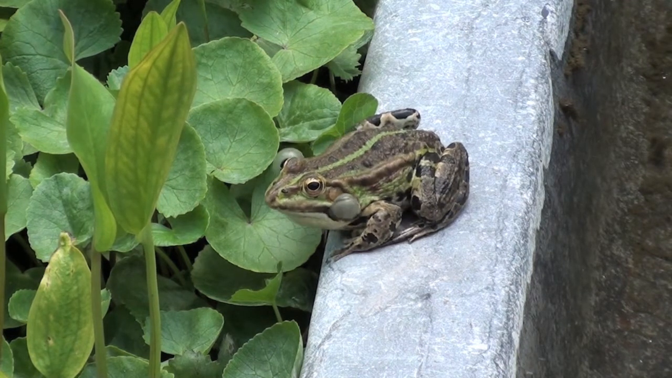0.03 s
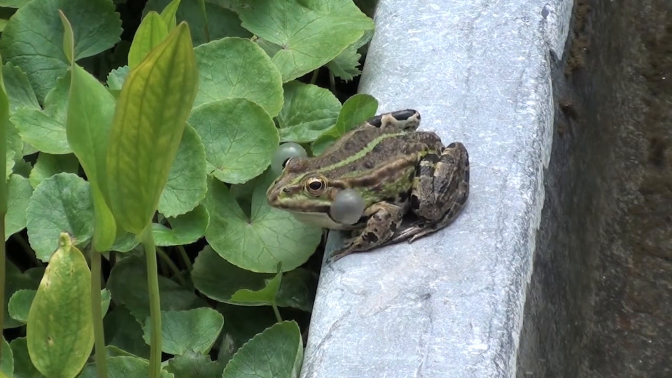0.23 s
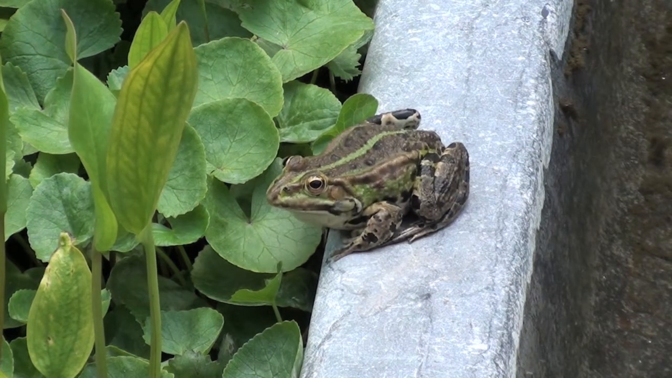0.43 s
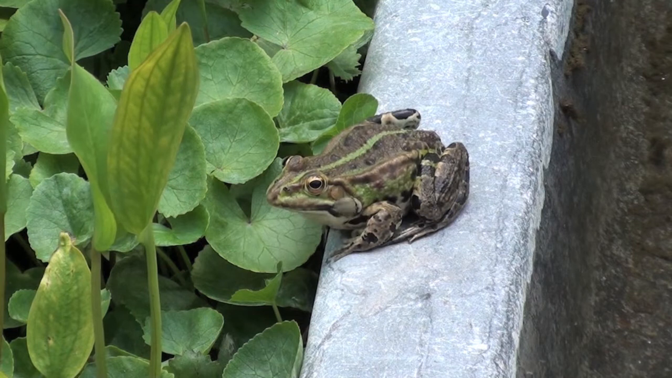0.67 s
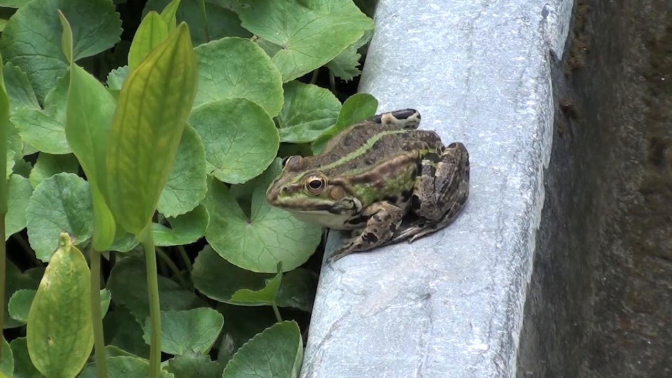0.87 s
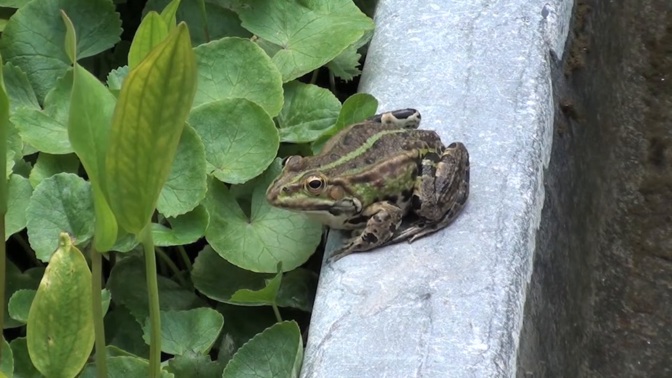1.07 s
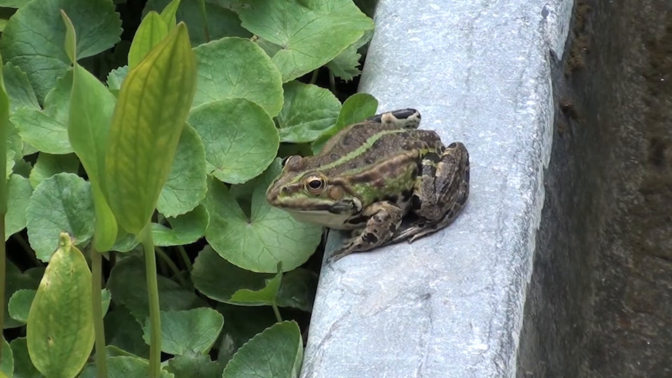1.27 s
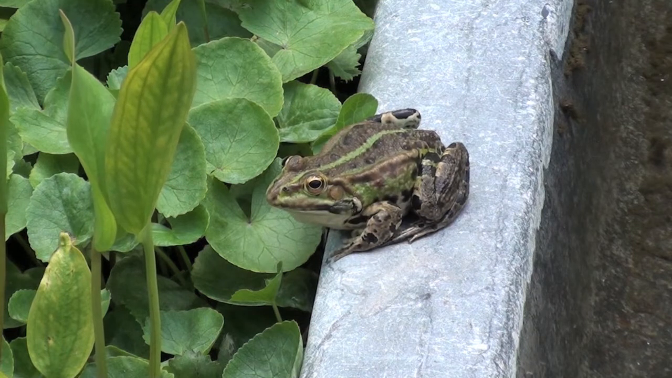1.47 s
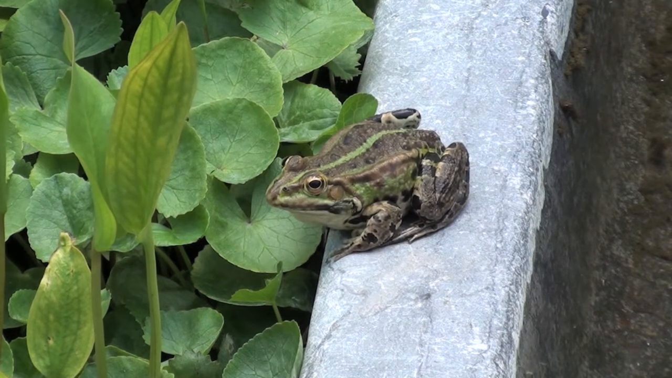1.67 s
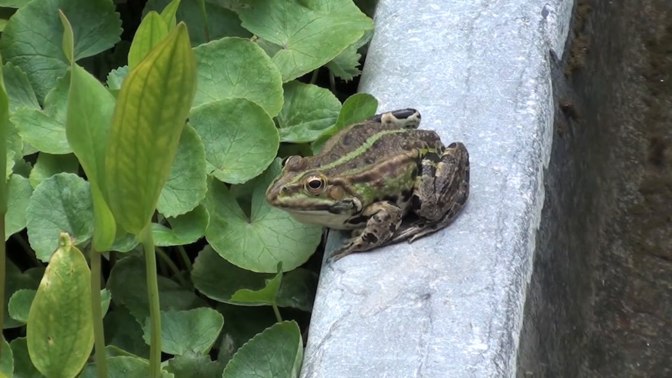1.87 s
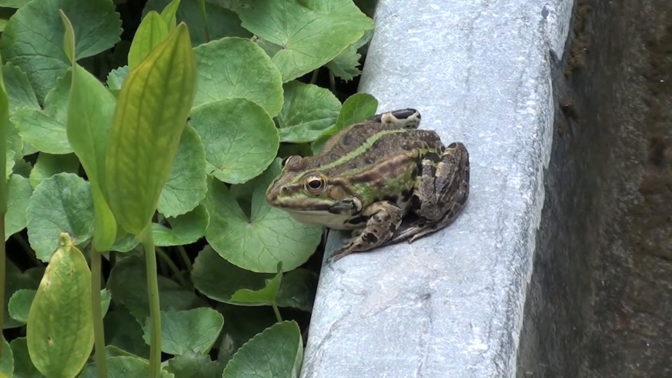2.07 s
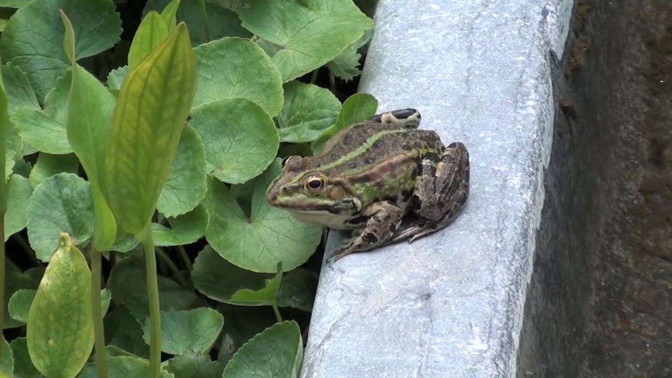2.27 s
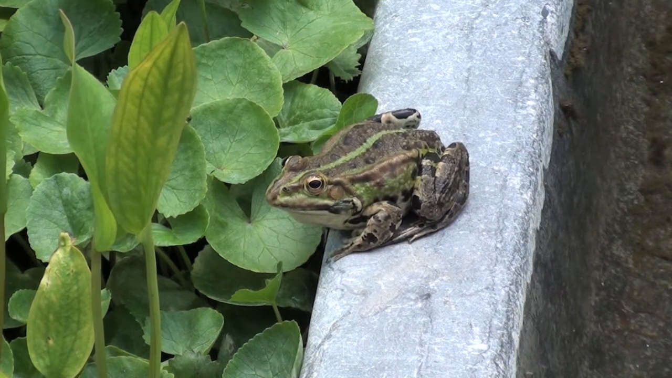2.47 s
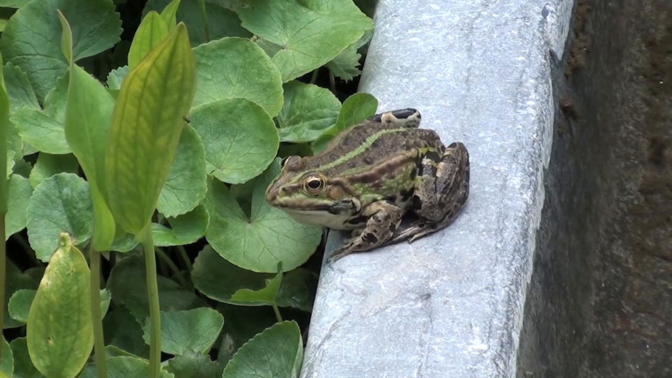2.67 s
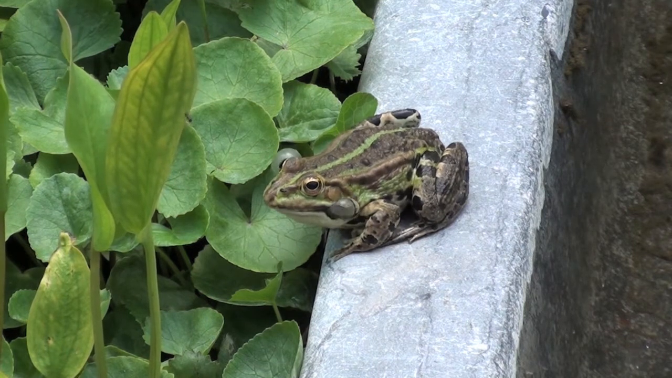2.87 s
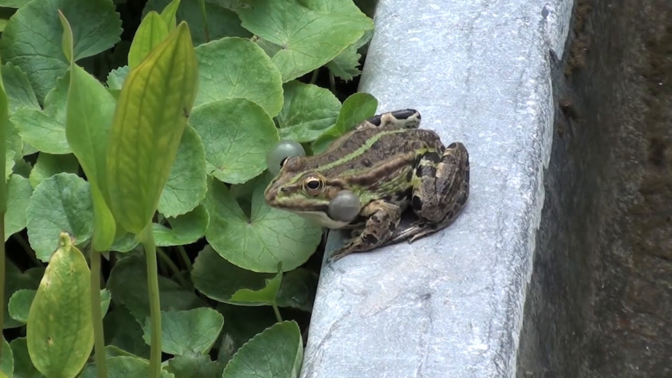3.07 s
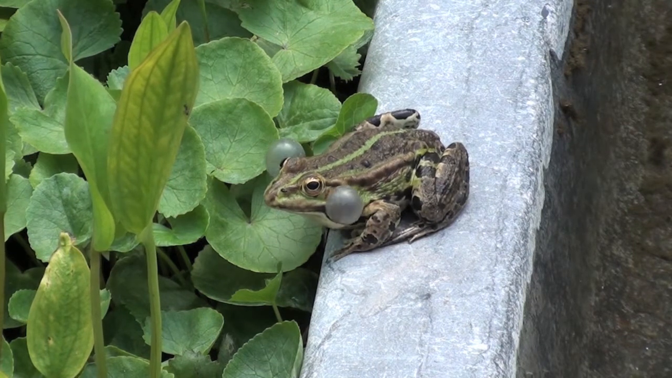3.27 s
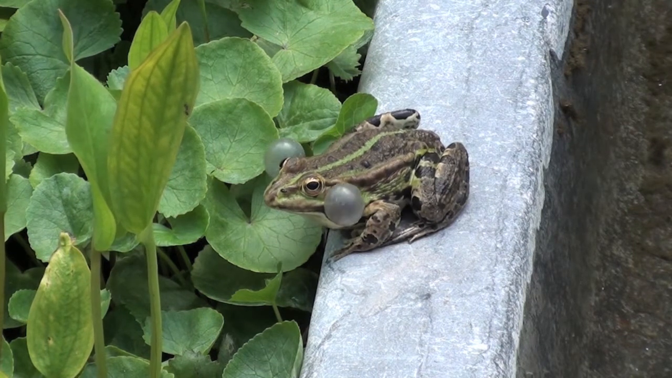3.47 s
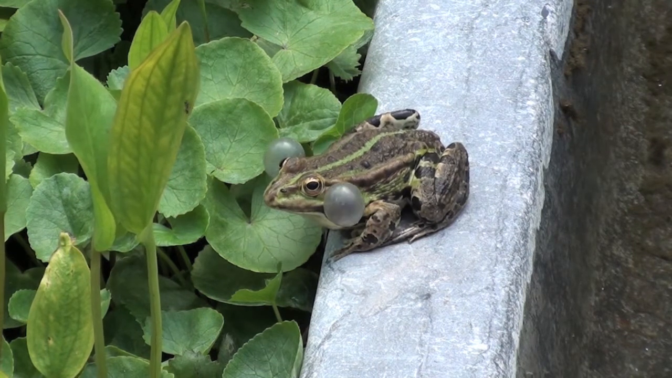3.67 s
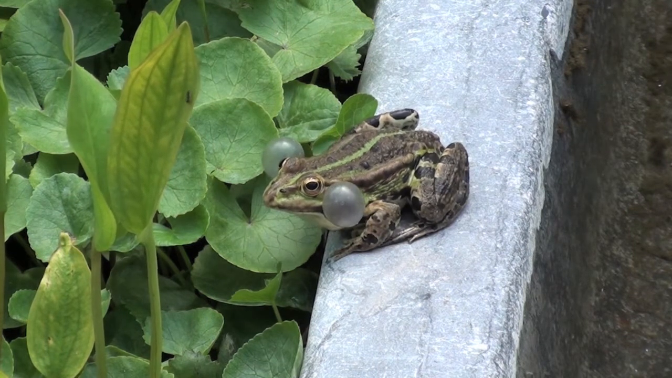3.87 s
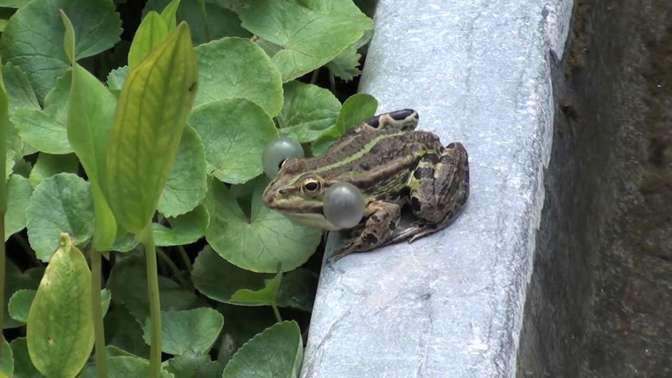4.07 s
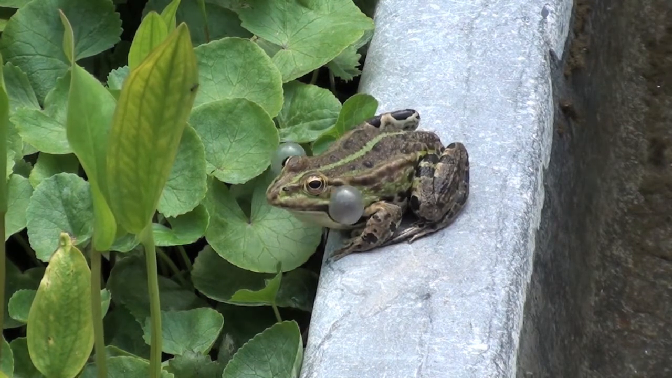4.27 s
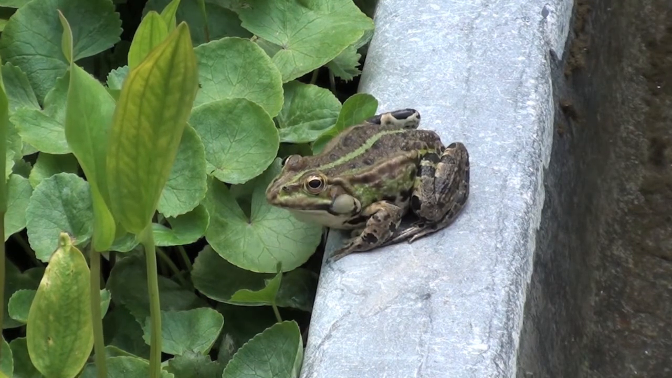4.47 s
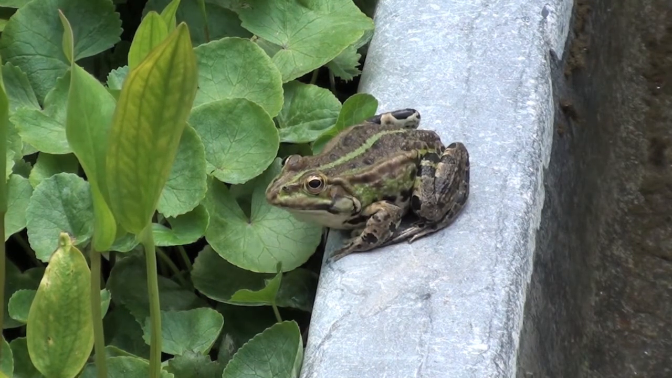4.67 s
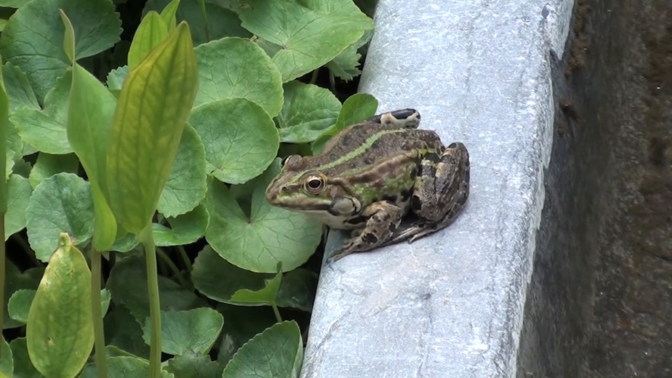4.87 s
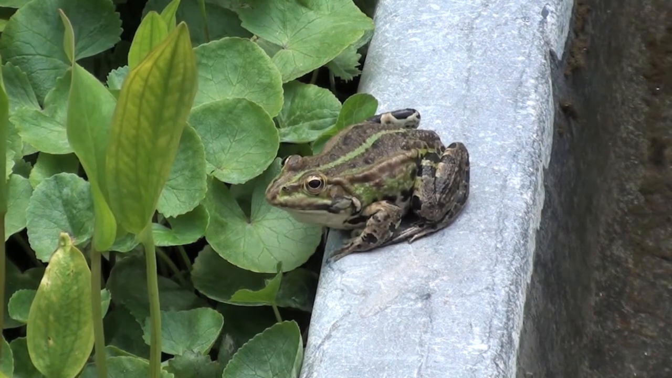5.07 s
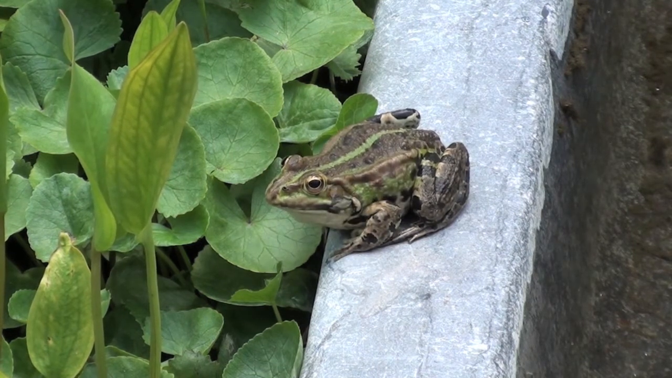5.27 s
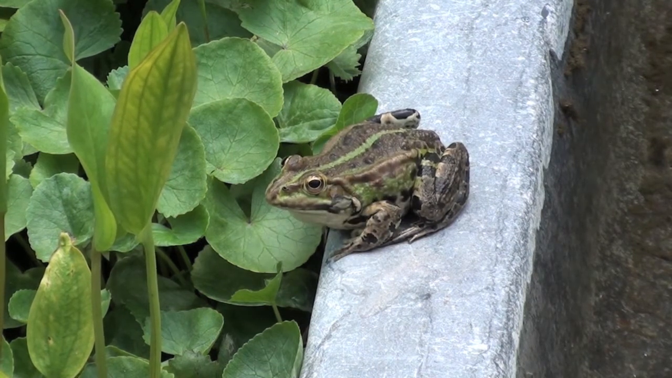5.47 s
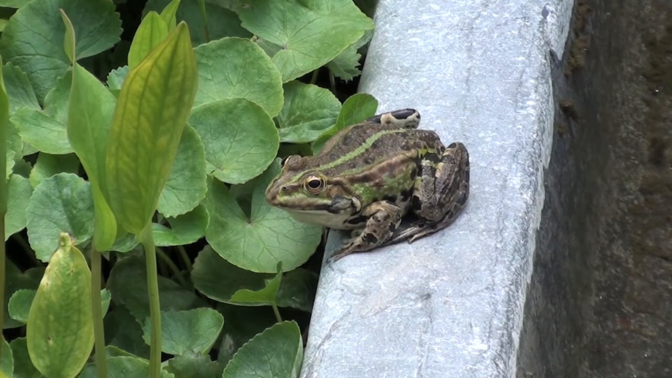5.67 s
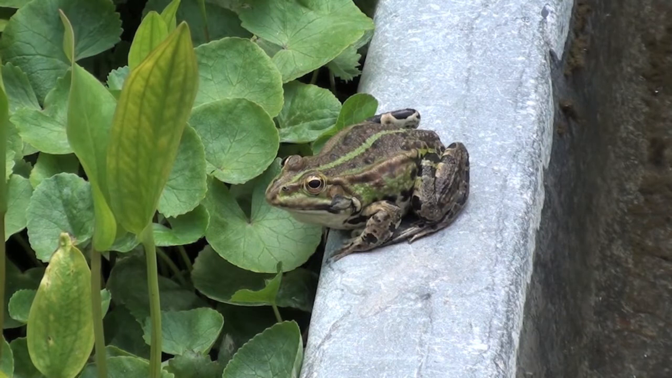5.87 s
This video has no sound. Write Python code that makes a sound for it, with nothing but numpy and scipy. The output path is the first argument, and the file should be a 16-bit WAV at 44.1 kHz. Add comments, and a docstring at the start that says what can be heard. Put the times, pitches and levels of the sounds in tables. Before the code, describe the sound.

A water frog by a walled pool squawks, then gives a long swelling rattling croak, while a farther frog rattles fainter over soft outdoor hush.

```python
"""Over a steady outdoor hush and a faint fluttering band of noise near 2.3 kHz, a water frog at the edge
of a walled pool squawks. A second frog, farther off, gives two rattles; then the near one clicks, squawks,
gives a long swelling rattle through its two cheek sacs and squawks again. Faint birds coo and chirp, the far
frog rattles a third time, and a third frog clucks softly at the end. Each squawk, click and rattle is made of
larynx pulses ringing the sacs and throat, answered by the pool walls; birds and clucks are gliding sine tones."""
import sys
import numpy as np
from scipy import signal
from scipy.fft import rfft, irfft, next_fast_len
from scipy.io import wavfile
from scipy.ndimage import uniform_filter1d, minimum_filter1d, map_coordinates

SR = 44100
rng = np.random.default_rng(int(sys.argv[2]) if len(sys.argv) > 2 else 0)


def log_audio(samples):
    """Write samples as a 16-bit WAV file to the path given in sys.argv[1]."""
    # one column per channel
    frames = np.atleast_2d(samples).T
    # limit to full scale, then quantise
    limited = np.clip(frames, -1, 1)
    pcm = np.round(limited * 32767).astype(np.int16)
    wavfile.write(sys.argv[1], SR, pcm)


N = 260631  # length in samples


def amp(db):
    """Turn decibels into a gain."""
    return 10 ** (np.asarray(db) / 20)


def unit(x):
    """Scale to an average (rms) strength of 1."""
    return x / np.sqrt(np.mean(x ** 2) + 1e-20)


def along(points, hz):
    """Read a curve of (pitch_hz, value) points, evenly in musical pitch."""
    point_hz, value = np.transpose(points)
    return np.interp(np.log(hz + 1), np.log(point_hz + 1), value)


def read(rows, times):
    """Read each column of a curve at the given times; the first column is time."""
    row_s, *columns = np.transpose(rows)
    return [np.interp(times, row_s, column) for column in columns]


def filtered(x, response):
    """Multiply the spectrum of x by a response that depends on frequency."""
    size = next_fast_len(N + SR // 2)
    spectrum = rfft(x, size) * response(np.fft.rfftfreq(size, 1 / SR))
    return irfft(spectrum, size)[..., :N]


def coloured(x, points, size=2048):
    """Shape the tone to (pitch_hz, gain_db) points without sounding ahead of time."""
    gain = amp(along(points, np.fft.rfftfreq(size, 1 / SR)))
    # folding the cepstrum forward keeps the whole filter response after each sound
    cepstrum = irfft(np.log(gain))
    cepstrum[1:size // 2] *= 2
    cepstrum[size // 2 + 1:] = 0
    impulse = irfft(np.exp(rfft(cepstrum)))
    return signal.fftconvolve(x, impulse)[:N]


def yard(x, side_db, size=256):
    """Stereo echo made of fading noise; each pitch range dies at its own pace, the treble soonest."""
    # echo fade: pitch_hz, time_to_fall_60_db_s
    fade_times = [(300, 0.2), (700, 0.4), (2000, 0.33), (5000, 0.36), (9000, 0.05)]
    hz, t, noise = signal.stft(rng.standard_normal((2, SR // 2)), SR, nperseg=size)
    fade_s = along(fade_times, hz)[:, None]
    tail = signal.istft(noise * amp(-60 * t / fade_s), SR, nperseg=size)[1]
    tail = tail / np.linalg.norm(tail[0])
    mid, side = signal.fftconvolve(x[None], tail, axes=1)[:, :N]
    return np.array([mid + amp(side_db) * side, mid - amp(side_db) * side])


def walls(x, tones, width_hz):
    """Close reflections add up to narrow, briefly ringing resonances on top of the direct sound."""
    def response(f):
        total = 1
        for hz, db in tones:
            damping = 1j * f * width_hz
            total = total + amp(db) * damping / (hz ** 2 - f ** 2 + damping)
        return total
    return filtered(x, response)


def hush():
    """Steady outdoor air: shaped noise, nearly alike in both ears in the bass, wider in the middle range."""
    # tone of the air: pitch_hz, relative_level_db_per_hz
    air_colour = [(20, -26), (40, -12), (65, -0.5), (105, -4), (175, 1.5), (300, -0.5), (450, -3),
                  (700, -1), (1300, -8), (1900, -9), (3300, -11), (5300, -12.5), (9000, -16),
                  (15500, -17.5)]
    # how alike left and right are: pitch_hz, likeness (1 = the same)
    likeness = [(40, 1), (130, 0.99), (260, 0.85), (700, 0.34), (2500, 0.36), (8000, 1)]

    def response(hz):
        turn = np.arccos(np.clip(along(likeness, hz), -1, 1)) / 2
        return amp(along(air_colour, hz)) * [np.cos(turn), np.sin(turn)]

    mid, side = filtered(rng.standard_normal((2, N)), response)
    return amp(-52.5) * unit(np.array([mid + side, mid - side]))


def faint_band(flutter_rate=45):
    """A faint band of noise near 2.3 kHz, fluttering at random; perhaps the far frog's long echo."""
    # the band over time: time_s, level_db (before the flutter and the left-right balance)
    band_levels = [(0, -49), (1.45, -60), (2.2, -55), (2.42, -53), (2.65, -62), (5.3, -58.5), (5.5, -74),
                   (5.91, -61)]
    t = np.arange(N) / SR
    level_db, = read(band_levels, t)
    flutter = map_coordinates(rng.standard_normal(int(t[-1] * flutter_rate) + 4), [t * flutter_rate])
    colour = [(1300, -39), (1900, -14), (2250, -8), (2600, -18), (3300, -37.5)]  # pitch_hz, gain_db
    band = filtered(rng.standard_normal(N), lambda hz: amp(along(colour, hz)))
    return amp(level_db + 2 * flutter) * unit(band) * amp([[1], [-1]])  # a little to the left


def ring(pulses, voice, attack, scatter, rough_db, size=800):
    """Every (time_s, level_db) pulse rings the sacs, their overtones and the throat as dying sine tones."""
    # throat tones: pitch_hz, ring_s (stretched below while the sacs are slack), relative_level_db
    throat_tones = [(641, 0.001, -2), (925, 0.00051, -3.5)]
    # overtones: ratio_to_overtone_pitch, ring_s, relative_level_db
    overtones = [(0.842, 0.0012, -6.5), (0.998, 0.0013, -2), (1.575, 0.002, -27.5), (2.2, 0.0017, -32.5),
                 (2.49, 0.0012, -20.5)]
    s, db = np.transpose(pulses)
    sac_hz, sac_ring, throat_db, over_hz, over_db = [c[:, None] for c in read(voice, s)]
    index = np.ceil(s * SR).astype(int)[:, None] + np.arange(size)
    t = index / SR - s[:, None]  # seconds since each pulse
    chance = rng.standard_normal((len(s), 3))

    def mode(hz, life):
        return np.sin(2 * np.pi * hz * t) * np.exp(-t / life)

    sac = mode(sac_hz * (1 + scatter * chance[:, :1]), sac_ring)
    slack = amp(throat_db)  # with slack sacs the throat rings louder and longer
    throat = slack * sum(amp(level) * mode(hz, life * (1 + slack)) for hz, life, level in throat_tones)
    pulse_over_hz = over_hz * (1 + 0.015 * chance[:, 1:2])
    over = sum(amp(level) * mode(ratio * pulse_over_hz, life) for ratio, life, level in overtones)
    wave = sac + throat - amp(over_db + rough_db * chance[:, 2:]) * over
    wave *= amp(db)[:, None] * (1 - np.exp(-t / attack)) ** 2  # soft tissue starts smoothly
    return np.bincount(index.clip(0).ravel(), wave.ravel(), N)[:N]


def near_ring(pulses, s, sac_hz, throat_db, sac_ring, over_hz, over_db):
    """The near frog's voice; each control is a constant or a curve over the times s."""
    voice = np.column_stack(np.broadcast_arrays(s, sac_hz, sac_ring, throat_db, over_hz, over_db))
    return ring(pulses, voice, attack=0.00013, scatter=0.036, rough_db=2.5)


def squawk(rows, jitter, rough_db):
    """An unbroken, uneven train of pulses following (time_s, pulses_per_s, level_db) rows."""
    t = np.arange(rows[0][0], rows[-1][0], 1 / SR)
    rate, db = read(rows, t)
    pulse_count = np.floor(np.cumsum(rate) / SR)
    at = np.flatnonzero(np.diff(pulse_count, prepend=-1))  # a pulse wherever the count steps up
    chance = rng.standard_normal((len(at), 2))
    pulse_s = t[at] + jitter * chance[:, 0] / rate[at]
    return list(zip(pulse_s, db[at] + rough_db * chance[:, 1]))


def beat(first, last, rate, slowing):
    """Note times of a rattle whose beat slows (or quickens) evenly."""
    u = np.linspace(0, 1, round((last - first) * rate) + 1)
    return first + (last - first) * (u - slowing * u * (1 - u) / 2)


def note(s, db, gap, before_db, step, opening_db, count=5):
    """One rattle note: a dense buzz of small pulses grows and slows into two strong ones."""
    k = np.arange(count)  # counted backwards from the strong pair
    steps = step * .72 ** k * np.exp(0.131 * rng.standard_normal(count))
    lead_s = s - gap - np.cumsum(steps)
    lead_db = db + before_db / 2 + opening_db + 6 * 0.22 ** k + 0.65 * rng.standard_normal(count)
    # one weak pulse trails behind
    straggler = (s + rng.uniform(.008, .013), db - 12 + 2.5 * rng.standard_normal())
    return [*zip(lead_s, lead_db), (s - gap, db + before_db), (s, db), straggler]


def rattle(sac_ring=0.00108, rough_db=0.8, pair_db=1.6, gap_scatter=0.08):
    """Notes on a slowing beat; as the sacs fill, they swell, lose their throatiness and grow brighter."""
    # the beat: first_note_s, last_note_s, notes_per_s, share by which the beat slows
    timing = (3.0698, 4.191, 23.2, 0.058)
    # the sacs tighten, then slacken: time_s, sac_pitch_hz
    sac_curve = [(3.06, 2140), (3.328, 2660), (3.482, 2760), (4.014, 2600), (4.096, 2380), (4.21, 2300)]
    full_db, swell_db, swell_s = -3.8, 19.6, 0.3  # full effort, how far below it starts, time constant
    gap_s, gap_grows_s_per_s = 0.0052, 0.0018  # usual gap between a note's two strong pulses; it widens
    before_db = -3.2  # usual level of the first strong pulse against the second
    throat_db, throat_slack_db = -14.5, 9.5  # throat under full sacs; how much louder under slack ones
    over_hz, over_slack_hz = 4670, 160  # overtone pitch of full sacs; how much higher when slack
    over_db, over_db_per_s = -20.5, 12.5  # the overtones brighten through the rattle
    times = beat(*timing)
    age = times - times[0]
    slack = np.exp(-age / swell_s)
    pulses = []
    for s, level, usual_gap in zip(times, full_db - swell_db * slack, gap_s + gap_grows_s_per_s * age):
        chance = rng.standard_normal(3)
        db = level + rough_db * chance[0]
        gap = usual_gap * np.exp(gap_scatter * chance[1])
        lean_db = pair_db * chance[2]  # either pulse of the pair may be the stronger
        opening_db = -18.4 - .5 * db  # the opening buzz stands out more in quiet notes
        pulses += note(s + gap / 2, db - lean_db / 2, gap, before_db + lean_db, .0043, opening_db)
    sac_hz, = read(sac_curve, times)
    return near_ring(pulses, times, sac_hz, throat_db + throat_slack_db * slack, sac_ring,
                     over_hz + over_slack_hz * slack, over_db + over_db_per_s * age)


def near_frog():
    """Squawks, clicks and the long rattle: pulses ring the sacs and throat, then the pool walls colour them."""
    # squawks, one curve each: time_s, pulses_per_s, pulse_level_db, sac_pitch_hz, throat_level_db
    squawk_curves = [
        [(.003, 155, -40, 1010, 8.5), (.062, 190, -32, 1110, 7.5), (.083, 235, -17, 1540, -3),
         (.142, 251, -2.5, 1860, -15.5), (.175, 234, -4, 1890, -14.5), (.2, 380, -1.5, 1950, -11),
         (.222, 340, -9, 2070, -4.5), (.24, 300, -21.5, 2070, -3)],
        [(2.9445, 98, -19.5, 1700, 0), (2.985, 134, -20, 1700, -2), (3.02, 185, -30.5, 1810, -2),
         (3.043, 220, -26, 1980, -4)],
        [(4.2045, 123, -14, 2280, -10.5), (4.216, 250, -12, 2220, -8), (4.232, 295, -4.5, 2190, -5),
         (4.246, 297, -20, 2200, -4.5)],
    ]
    # tone of each squawk: sac_ring_s (at the pitch ring_at_hz), overtone_pitch_hz, overtone_level_db
    squawk_tones = [(0.0005, 4980, -19.5), (0.001, 5090, -17.5), (0.00105, 4690, -13)]
    # single pulses before the rattle: time_s, pulse_level_db
    click_pulses = [(2.68, -49.5), (2.7965, -38.5), (2.8728, -31.5), (2.9126, -26), (2.9235, -25.5)]
    # slack sacs: sac_pitch_hz, throat_level_db, sac_ring_s, overtone_pitch_hz, overtone_level_db
    click_tone = (2070, 6, 0.0012, 5450, -17)
    # tone of the whole call: pitch_hz, gain_db
    call_colour = [(280, -50), (440, -14.5), (570, -15), (660, -4), (1300, 2.5), (1650, -2), (2600, 1),
                   (3400, -1), (5000, -0.5), (6200, -2), (9000, 3.5), (11700, 2), (14000, -30)]
    # tones the pool walls reinforce: pitch_hz, level_against_direct_sound_db
    wall_tones = [(652, -2), (822, 2.5), (975, 2), (1115, 1), (1272, 8), (1384, 2), (1539, 9), (1630, -3),
                  (1851, 7), (2110, 2), (2340, -9), (2694, -7), (2855, -3), (3230, 4.5)]
    ring_at_hz = 2000  # slacker sacs die sooner than at this pitch
    call = near_ring(click_pulses, [0], *click_tone) + rattle()
    for rows, (sac_ring, over_hz, over_db) in zip(squawk_curves, squawk_tones):
        s, rate, db, sac_hz, throat_db = np.transpose(rows)
        pulses = squawk(np.column_stack([s, rate, db]), jitter=0.082, rough_db=1.85)
        ring_s = sac_ring * sac_hz / ring_at_hz
        call = call + near_ring(pulses, s, sac_hz, throat_db, ring_s, over_hz, over_db)
    call = amp(3.0) * coloured(call, call_colour)
    call = walls(call, wall_tones, width_hz=35)
    return (call + amp(-10.5) * yard(call, side_db=-15.5)) * amp([[.25], [-.25]])


def far_frog():
    """The same kind of rattle, and some clicks, from the left, blurred by distance with a strong echo."""
    # rattles: first_note_s, last_note_s, notes_per_s, share by which the beat slows (negative: quickens),
    # middle_level_db, rise_db, throat_level_db, overtone_pitch_hz
    far_rattles = [(0.318, 1.022, 22.7, -0.17, -32, -1, -20, 4760),
                   (1.535, 2.192, 22.8, 0.01, -32.8, 1.5, -19, 4690),
                   (4.348, 5.17, 24.6, 0.18, -32.7, 3, -35, 4630)]
    # the sacs in each rattle: time_s, sac_pitch_hz
    far_sacs = [
        [(0.33, 2150), (0.478, 2130), (0.632, 2440), (0.954, 2170), (1.03, 2370)],
        [(1.52, 2430), (1.6, 2530), (1.998, 2520), (2.166, 2230), (2.2, 2290)],
        [(4.35, 2400), (4.396, 2520), (5.076, 2530), (5.17, 2220)],
    ]
    # clicks before the second rattle: time_s, pulse_level_db
    far_clicks = [(1.3, -36.5), (1.379, -32.5), (1.415, -32), (1.453, -32), (1.485, -36)]
    # click tone: sac_pitch_hz, sac_ring_s, throat_level_db, overtone_pitch_hz, overtone_level_db
    far_click_tone = (2330, 0.0017, -8.5, 4450, -9.5)
    # tone of the calls: pitch_hz, gain_db
    far_colour = [(300, -24), (620, 0.5), (1200, 11), (2200, 0.5), (3200, 4.5), (4000, 7), (4900, 0.5),
                  (5700, 0.5), (7500, 9), (11000, -9)]
    # tones the pool walls reinforce: pitch_hz, level_against_direct_sound_db
    far_wall_tones = [(2200, 7), (2365, -1), (2480, 6), (2570, -1), (2875, 3), (3210, 10), (3645, -5),
                      (3935, 4.5), (4665, 11), (4780, 6)]
    tight_ring_s, tight_hz = 0.0011, 2500  # ring of the sacs at their tight pitch
    ring_doubles_hz = 250  # the fall in pitch that doubles the ring
    over_db, over_db_per_s = -6, 1.5  # the overtones brighten through each rattle
    calls = [(far_clicks, [(0, *far_click_tone)])]
    for (first, last, rate, slowing, db, rise_db, throat_db, over_hz), sacs in zip(far_rattles, far_sacs):
        times = beat(first, last, rate, slowing)
        pulses = []
        for s, level in zip(times, db + rise_db * np.linspace(-.5, .5, len(times))):
            note_db = level + 0.8 * rng.standard_normal()
            pulses += note(s, note_db, rng.uniform(.004, .009), -1.5, step=.006, opening_db=-11)
        voice = []
        for s, hz in sacs:
            ring_s = tight_ring_s * 2 ** ((tight_hz - hz) / ring_doubles_hz)
            voice.append((s, hz, ring_s, throat_db, over_hz, over_db + over_db_per_s * (s - first)))
        calls.append((pulses, voice))
    call = sum(ring(pulses, voice, attack=0.00014, scatter=0.015, rough_db=1.0) for pulses, voice in calls)
    call = walls(coloured(call, far_colour), far_wall_tones, width_hz=16.7)
    return (amp(-5.5) * call + amp(-1) * yard(call, side_db=-12)) * amp([[2], [-2]])


def bird(slide=0.025):
    """Faint bird notes: pure sine tones that swell, fade and fall slightly in pitch, with much echo."""
    # thin chirps and two low coos: start_s, length_s, middle_pitch_hz, peak_db (before the mix below)
    bird_notes = [(2.311, 0.05, 5600, -57), (3.97, 0.2, 470, -44), (4.224, 0.18, 414, -48),
                  (4.748, 0.035, 7000, -55), (4.856, .04, 6720, -52), (4.99, 0.12, 6570, -58),
                  (5.127, .05, 6750, -55)]
    out = np.zeros(N + SR)
    for s, length, hz, db in bird_notes:
        u = np.linspace(0, 1, int(length * SR))
        phase = 2 * np.pi * np.cumsum(hz * (1 + slide * (.5 - u))) / SR
        out[round(s * SR):][:len(u)] += amp(db) * np.sin(np.pi * u) ** 2 * np.sin(phase)
    return amp(-6) * out[:N] + amp(-4) * yard(out[:N], side_db=-9)


def clucks(fall=0.092):
    """A third frog's short hollow notes: sine tones whose pitch sags as they die."""
    # soft clucks: start_s, peak_db (before the echo), settled_pitch_hz, time_to_peak_s
    cluck_notes = [(5.597, -42.5, 1082, 0.0093), (5.6105, -27.5, 617, 0.005), (5.624, -32.5, 593, 0.0037),
                   (5.6495, -33, 587, 0.0058), (5.866, -32, 580, 0.0028), (5.883, -32, 542, 0.0036),
                   (5.902, -33, 543, 0.0055)]
    t = np.arange(SR // 8) / SR
    out = np.zeros(N + SR)
    for s, db, hz, swell in cluck_notes:
        phase = 2 * np.pi * np.cumsum(hz * (1 + fall * np.exp(-t / 0.0076))) / SR
        envelope = (t / swell * np.exp(1 - t / swell)) ** 1.34
        out[round(s * SR):][:len(t)] += amp(db) * envelope * np.sin(phase)
    return out[:N] + amp(-8) * yard(out[:N], side_db=-12)


def scene():
    """The frogs, faint birds and faint band of noise over the hush."""
    return hush() + faint_band() + near_frog() + far_frog() + bird() + clucks()


def record(dry, ceiling=0.51, top_hz=15850):
    """A limiter briefly turns down the strongest pulses; nothing from top_hz upward is kept."""
    needed = ceiling / np.maximum(np.abs(dry).max(axis=0), ceiling)
    gain = uniform_filter1d(minimum_filter1d(needed, size=131), size=65)  # both sizes in samples
    return filtered(dry * gain, lambda hz: hz < top_hz)


dry = scene()
out = record(dry)
log_audio(out)
```